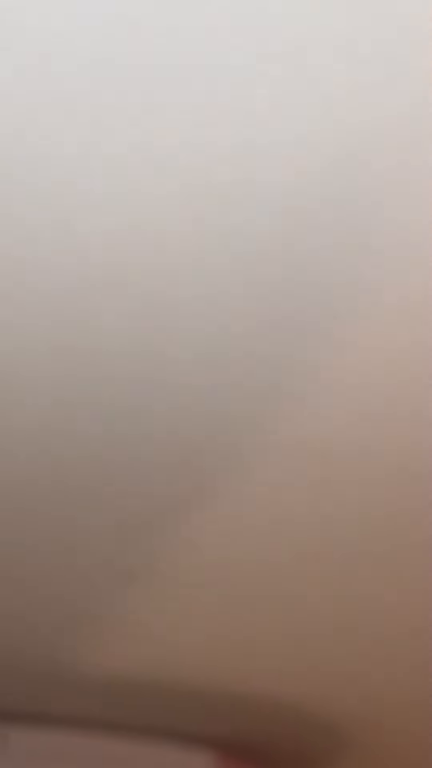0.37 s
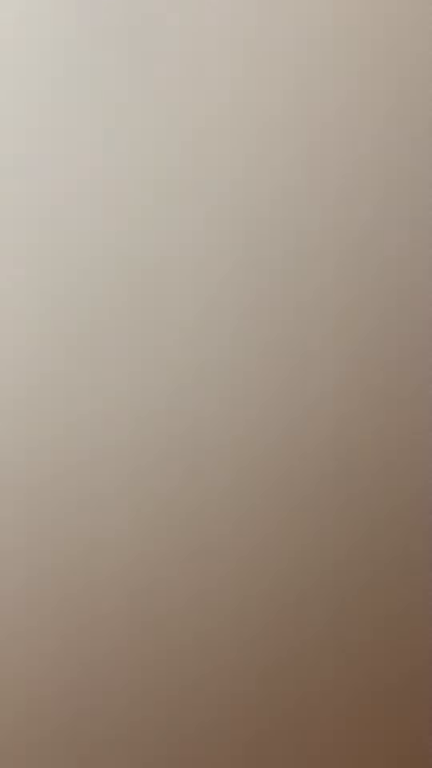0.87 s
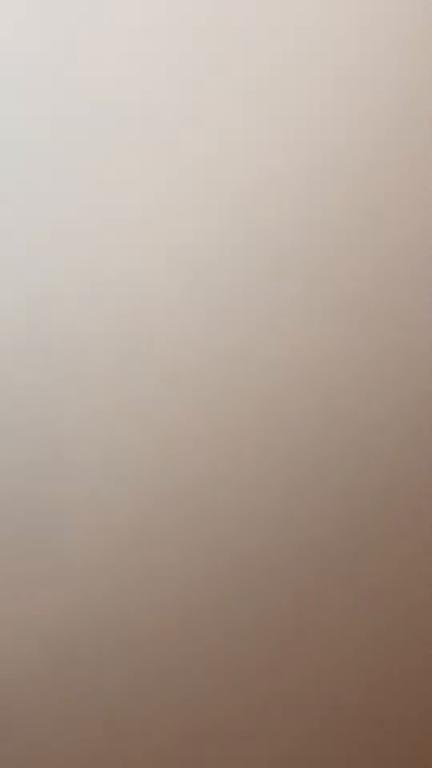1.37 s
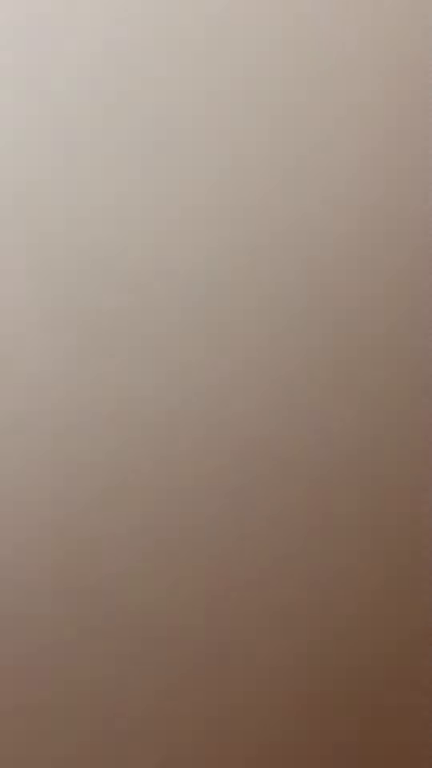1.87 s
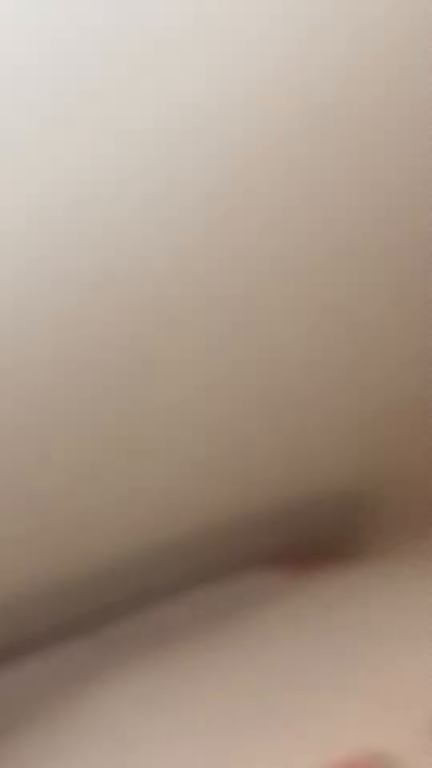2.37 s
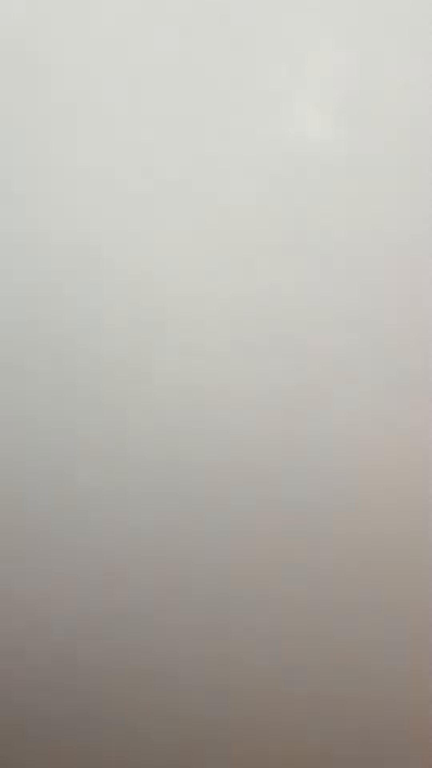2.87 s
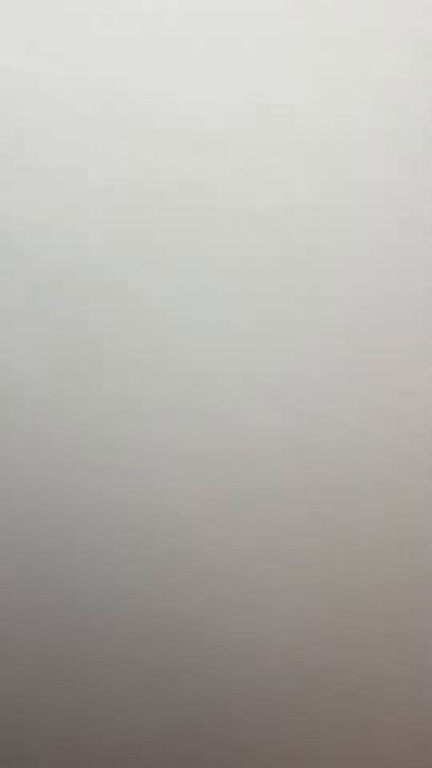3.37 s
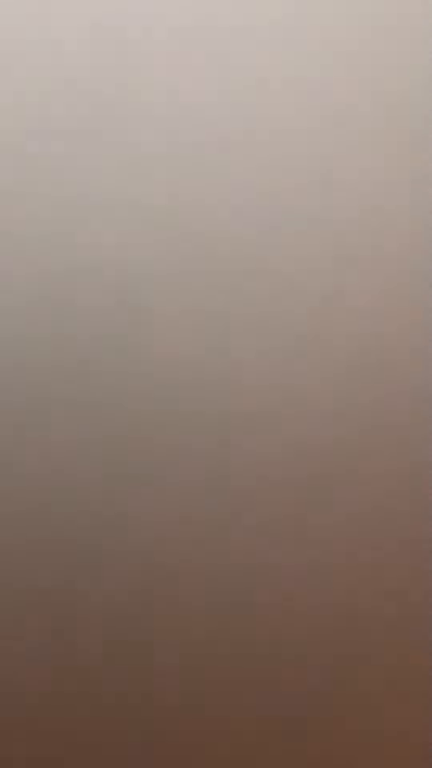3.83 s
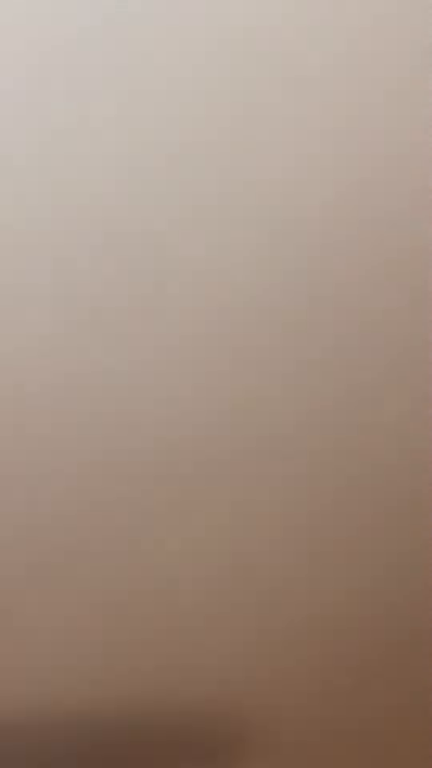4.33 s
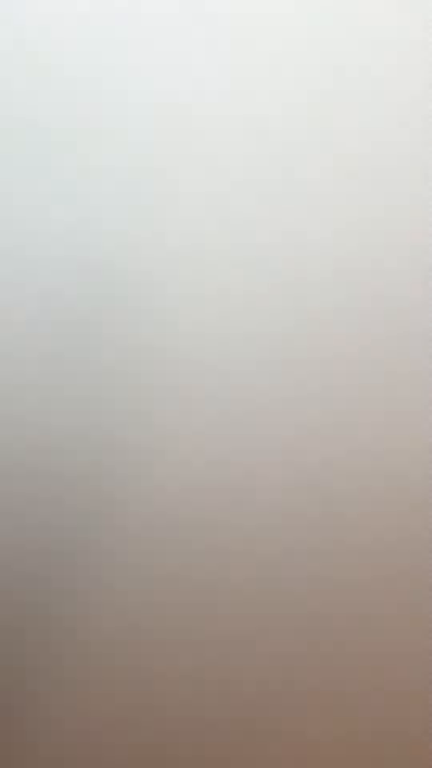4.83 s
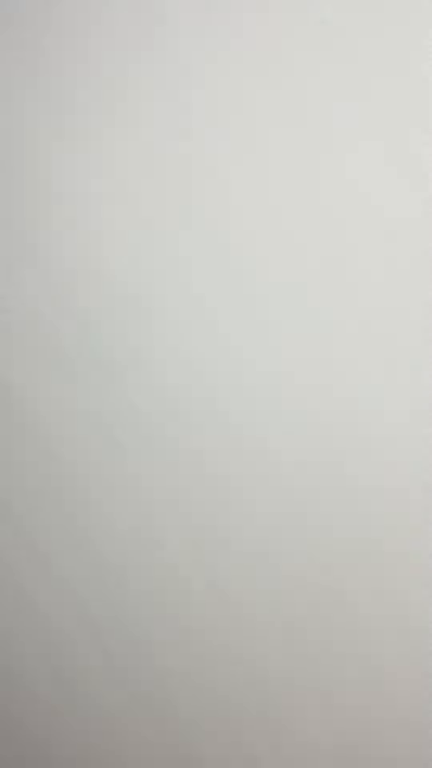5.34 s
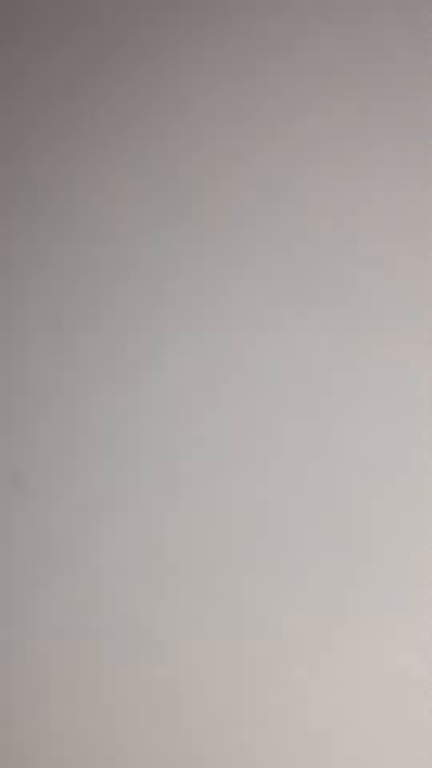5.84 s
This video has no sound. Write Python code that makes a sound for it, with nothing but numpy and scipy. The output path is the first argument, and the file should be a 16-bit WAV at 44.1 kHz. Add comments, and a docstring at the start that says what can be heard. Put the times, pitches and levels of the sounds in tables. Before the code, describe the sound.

Close handling noise of a phone in the hand, with dull heavy thuds, fabric swishes, sharp little ticks and low tremor rumble.

```python
"""A phone is turned about in the hand indoors: cloth strokes, modelled as shaped fibre noise, slide throughout.
The grip bumps the body hard near 0.5-0.7 s and again near 1.3-1.4 s; struck modes ring and hard clinks join in.
Longer strokes follow, with shell creaks clustered near 2.9 and 3.4 s and soft nudges of the body after 4.1 s.
Beneath lie hand tremor and jolts, as noise-driven resonances, and a faint room hum. Of the two microphone
ports the left takes most of the shaking; the cloth and the contacts reach both, partly alike."""
import sys
import numpy as np
from scipy import signal
from scipy.fft import rfft, irfft
from scipy.io import wavfile
from scipy.ndimage import uniform_filter1d

SR = 44100
rng = np.random.default_rng(int(sys.argv[2]) if len(sys.argv) > 2 else 0)


def to_wav(s):
    """Save 16-bit WAV."""
    ch = np.atleast_2d(s).T  # columns
    pcm = np.round(np.clip(ch, -1, 1) * 32767)  # PCM
    wavfile.write(sys.argv[1], SR, pcm.astype(np.int16))


def elevation(decibels):
    """Turn decibel levels (scalar or array-like) into linear amplitude ratios."""
    levels = np.asarray(decibels, float)
    return 10 ** (levels / 20)


N = 262836
TIME = np.arange(N) / SR
STEPS = np.arange(0, N + 64, 64) / SR   # slow time grid in s
HZ = np.maximum(np.fft.rfftfreq(N, 1 / SR), 1)

# Bumps on the body. Each row: time in seconds, body strike level in dB, pitch struck most in Hz,
# edge strike level in dB, edge pitch in Hz.
BODY_BUMPS = [(0.524, -39, 219, -59, 500), (0.588, -37, 230, -55.5, 602), (0.671, -29, 249, -34, 1000),
              (0.6745, -22.5, 250, -42.5, 1100), (0.678, -19.5, 222, -50.5, 435),
              (0.688, -20.5, 168, -50.5, 393), (0.705, -19.5, 215, -48.5, 495),
              (1.268, -38.5, 201, -77, 500), (1.329, -36, 135, -46.5, 1095), (1.339, -25, 125, -51.5, 500),
              (1.366, -32, 157, -51, 416), (1.389, -29.5, 143, -57, 450), (3.396, -54, 213, -48.5, 990),
              (4.726, -52, 192, -83, 500)]
# Soft nudges of the lowest body mode. Each row: time in seconds, strike level in dB.
PALM_NUDGES = [(1.443, -33), (4.149, -41), (4.163, -35), (4.345, -43), (4.745, -44.5)]
# Creaks of the shell. Each row: time in seconds, level in dB before a common cut, pitch struck most in Hz,
# loss away from it in dB per octave.
SHELL_TICKS = [(0.3588, -44, 4660, 17), (0.5198, -39.5, 4400, 16), (0.6712, -38, 1900, 4.5),
               (0.739, -60, 2310, -5.5), (0.7696, -45.5, 2730, 3.5), (0.8887, -43.5, 4480, 8),
               (1.1904, -31, 4670, 10.5), (1.3892, -34.5, 3220, 6.5), (1.585, -53, 4500, 1),
               (1.7056, -33.5, 9450, 6), (2.8167, -27, 9200, 8.5), (2.835, -34, 6140, 6.5),
               (2.865, -38, 8750, 14), (2.885, -34, 7040, 6.5), (2.8977, -26.5, 9500, 11),
               (3.3622, -50.5, 3910, 9), (3.397, -24, 2420, 6), (3.4108, -33.5, 2485, 5),
               (3.456, -27, 7800, 5.5), (3.9, -45.5, 3080, 4), (4.388, -37, 2410, 17),
               (4.4484, -26, 1900, 20), (4.717, -47.5, 3020, 3), (5.4799, -36, 3570, 11),
               (5.855, -54, 4200, 13)]
# Small hard clinks. Each row: time in seconds, level in dB before a common cut, pitch struck most in Hz.
HARD_CLINKS = [(1.269, -32.5, 3270), (1.3758, -41, 2470), (1.388, -29, 2510), (4.464, -43.5, 1740)]

# Noise-driven resonances of hand and body in three groups, of the right port, and of the hum.
# Each row: centre in Hz, width in Hz, relative level in dB.
SWAY_MODES = [(61.7, 32, -4), (35.8, 20, -27)]
SLOW_FLEX_MODES = [(120, 26.5, -0.27), (169.6, 17, -0.77)]
QUICK_FLEX_MODES = [(221.3, 28.6, 6), (255, 8.5, 2.5), (299, 120, -8)]
RIGHT_RUMBLE_MODES = [(63, 41, 5), (125, 47, 1.5), (213, 145, -10)]
HUM_MODES = [(114.6, 6.4, -6.5), (237.2, 5.7, -7), (459, 2.5, -5)]
# Struck modes of the body, its edge, the shell and the small hard thing.
# Each row: frequency in Hz, relative level in dB, time to decay by 60 dB in seconds.
BODY_MODES = [(69.3, 0.5, 0.072), (125.4, -5.5, 0.24), (158.8, -1.5, 0.17), (206, -10, 0.058),
              (256.6, 0, 0.11), (304, -16.5, 0.11), (435, -26.5, .06)]
EDGE_MODES = [(349, -5, .05), (408, 4, 0.069), (500, 9, 0.051), (630, 1, 0.059), (735, 3, 0.044),
              (820, -1, 0.048), (990, -1.5, 0.024), (1155, -7, 0.042), (1250, -1.5, 0.059),
              (1550, -3.5, 0.013), (1900, -10.5, 0.007), (2170, -7, 0.012)]
SHELL_MODES = [(1700, -4, 0.019), (2470, -3.5, 0.011), (3550, -1.5, 0.0067), (4200, 3, 0.0052),
               (4860, 11.5, 0.0014), (7840, 9.5, 0.0021), (8880, 4, 0.0047), (10700, 8, 0.0017),
               (14800, -6.5, 0.0016)]
HARD_MODES = [(1627, 1, 0.07), (2330, -4, 0.018), (2780, 0, 0.024), (3170, -4, 0.017), (4400, 2, 0.012),
              (5230, 2, 0.014)]

# Spectra of cloth in three parts, of cloth shaken by the body, and of the flexing back panel.
# Each row: frequency in Hz, relative level in dB.
RUSTLE_COLOUR = [(480, -6), (645, -3), (900, 0), (1300, -3.5), (1800, -1), (2400, -27)]
STROKE_COLOUR = [(1500, -26.5), (2000, 0), (2400, -1), (3500, -3), (4500, -3), (5200, -6), (5900, -10),
                 (7000, -27.5)]
TREBLE_COLOUR = [(5400, -29.5), (6100, 7.5), (6900, 6.5), (8500, 7.5), (11000, 3), (13000, 4), (15800, -7),
                 (16300, -30)]
SHAKEN_COLOUR = [(300, -12.5), (450, -1), (900, 1.5), (1500, -6.5), (2500, -18.5), (3200, -42)]
PANEL_COLOUR = [(260, -9), (350, 9.5), (420, 6), (560, 4.5), (720, -37.5)]
# Phase between the ports. Each row: frequency in Hz, lead of the left port in radians.
PORT_LEAD = [(0, 0.9), (340, 3.17), (3360, 2.98), (3960, 6.53), (4390, 7.08), (5600, 9.2), (6980, 10.8),
             (7670, 10.64), (9560, 12.9), (11100, 15.34), (13000, 15.74), (13900, 18.4), (15800, 18),
             (16400, 19.65)]
# Coherence of the ports. Each row: frequency in Hz, likeness from 0 to 1.
PORT_LIKENESS = [(300, 0.68), (450, 0.96), (900, 0.94), (1600, 0.63), (2300, 0.24), (4500, 0.33),
                 (6500, 0.52), (8000, 0.91), (15000, 0.96)]
FAR_PORT_DB = -21   # share of the body shaking that reaches the right port

# Strokes of cloth over the shell. Each row: crest in seconds, rise in seconds, fall in seconds, level in dB,
# treble in dB over the stroke.
CLOTH_STROKES = [(0.102, 0.54, 0.14, -64, -2), (.42, 0.54, 0.29, -82.5, -5), (.53, 0.058, 0.15, -70, -9.5),
                 (.67, 0.1, 0.12, -68.5, -18), (.908, 0.032, 0.17, -83.5, 0), (1.16, 0.12, 0.12, -73, -14),
                 (1.21, 0.052, 0.13, -73.5, 2.5), (1.28, 0.04, 0.32, -68.5, -21),
                 (1.398, 0.036, 0.078, -54.5, -4), (1.5, 0.2, 0.2, -72.5, -21),
                 (1.732, 0.21, 0.94, -61, -5), (2.125, 0.05, 0.096, -62, -4.5),
                 (2.489, 0.37, 0.24, -57, -3.5), (2.66, 0.12, 0.068, -65, -2.5),
                 (2.84, 0.047, 0.096, -70, -1), (2.905, 0.022, 0.089, -77, 12),
                 (3.231, 0.29, 0.28, -58, -3.5), (3.412, 0.027, 0.082, -54, -27),
                 (3.50, 0.082, 0.14, -59, -6), (3.695, 0.12, 0.081, -58.5, -3.5),
                 (3.81, 0.21, 0.038, -76, -12), (3.95, 0.075, 0.095, -61.5, -9.5),
                 (4.211, 0.27, 0.98, -60.5, -2.5), (4.52, 0.4, 0.27, -63.5, 1),
                 (4.726, 0.0089, 0.046, -59, -3.5), (4.797, 0.12, 0.11, -62, 0.5),
                 (5.199, 0.19, 0.31, -65, -5.5), (5.539, 0.07, 0.064, -76, -2.5),
                 (5.96, 0.067, 0.083, -79.5, 2)]
# How firmly the cloth presses. Each row: time in seconds, low rustle in dB over the stroke.
CLOTH_PRESSURE = [(0, 3), (.9, 8.5), (1.4, 0), (1.75, 2.5), (2.05, -5), (2.5, -7.5), (2.95, 0.5),
                  (3.4, 1.5), (3.52, 1.5), (3.7, -1), (3.95, -10), (4.35, 2), (4.6, 0.5), (4.8, -11),
                  (5.15, 4.5), (5.55, -2.5), (5.96, 0)]
STROKE_EDGE_DB = 20   # a stroke is this far down one rise before and one fall after its crest
CLOTH_REST_DB, TREBLE_REST_DB, RUSTLE_REST_DB = -86, -86, -84   # cloth lying still
RUSTLE_JOLT_DB, RUSTLE_PER_JOLT = -31.5, 0.72   # shaken cloth: offset in dB, dB per dB of jolt
SNAGS_PER_S, SNAG_DB = 210, 10.5   # single fibres catch and let go

# Jolts in the grip. Each row: time in seconds, level in dB, pitch shaken most in Hz,
# time to decay by 60 dB in seconds, right port in dB over the level.
GRIP_JOLTS = [(0.538, -37, 210, 0.43, -18), (.61, -36.5, 196, 0.46, -22), (0.679, -27.5, 244, 0.25, 4),
              (.725, -34, 170, 0.23, -26.5), (0.746, -31, 255, 0.24, -17.5), (0.783, -39.5, 261, 0.1, -28),
              (.86, -53, 226.3, 0.16, -15), (.77, -50, 61.6, 0.9, -13), (1.283, -50, 129, 0.089, -18),
              (1.336, -42, 252, 0.33, -25.5), (1.345, -33, 132, 0.46, -12), (1.387, -33, 209, 0.43, -6.5),
              (1.42, -39.5, 125, 0.54, -20), (1.457, -37, 61.7, 0.4, -29), (1.84, -58.5, 60.7, 0.076, -17),
              (2.47, -70, 119, 0.22, -1), (2.71, -61.5, 129, 0.46, -9), (3.08, -57.5, 128, 0.65, -19),
              (3.42, -58, 255, 1.4, -3.5), (3.66, -56.5, 149, 0.88, -4), (3.786, -44.5, 89.2, 0.11, -9.5),
              (3.968, -58, 220, 0.19, 6), (4.165, -53.5, 65.5, 0.3, -11), (4.21, -55, 211, 1.85, -5),
              (4.438, -51.5, 60, 0.25, -26), (4.71, -58, 238, 0.54, -10), (4.755, -50, 75, 0.99, -23),
              (5.07, -57.5, 61, .9, -7), (5.65, -56, 180, 0.2, -3)]
# Unsteadiness of the hand. Each row: time in seconds, level in dB before each group's share.
HAND_TREMOR = [(0, -73.5), (.3, -67), (.48, -70.5), (1.1, -64.5), (1.7, -66.5), (2.2, -69.5), (2.5, -62),
               (2.92, -72.5), (3.1, -63.5), (3.7, -64.5), (3.85, -66.5), (4.0, -69), (4.63, -74),
               (5.1, -65.5), (5.96, -72)]
TREMOR_SWAY_DB, TREMOR_SLOW_DB, TREMOR_QUICK_DB, TREMOR_RIGHT_DB = -2.3, -2, -1, -10   # shares
JOLT_RISE_DB_PER_CYCLE, JOLT_FOCUS_DB = 4.5, 19   # low jolts build more slowly; loss per octave off pitch
JOLT_FLICKER = 0.3   # share of the flicker left during a jolt


def rms_one(x):
    """Normalization: scales a signal to unit rms."""
    return x / np.sqrt(np.mean(x ** 2) + 1e-20)


def in_hz(points):
    """Interpolation of a spectrum along a logarithmic frequency axis."""
    hz, value = np.transpose(points)
    return np.interp(np.log(HZ), np.log(hz), value)


def drift(rate):
    """Slow random modulation of unit rms: random values, 2 * rate of them a second, joined by lines."""
    knots = rng.standard_normal(N // 64)
    return rms_one(np.interp(TIME * rate * 2, np.arange(len(knots)), knots))


def grains(grain_db, channels):
    """Impulsive noise: white noise whose samples differ much in size."""
    size = np.minimum(rng.exponential(size=(channels, N)), 5.0)
    return rng.standard_normal((channels, N)) * elevation(grain_db * size)


def ports(shared, own, colour=1):
    """Partial coherence: the right port hears the shared part phase-shifted, the rest from its own source."""
    alike = np.clip(in_hz(PORT_LIKENESS), 0, 1)
    lag = np.exp(-1j * np.interp(HZ, *np.transpose(PORT_LEAD)))
    left = rfft(shared) * colour
    right = alike * lag * left + np.sqrt(1 - alike ** 2) * rfft(own) * colour
    return irfft([left, right], N)


def fibres(spectrum, grain_db, patchy_db, flicker_db, count):
    """Frictional noise: coloured grains at both ports, each band swelling and fluttering on its own."""
    snags = elevation(SNAG_DB * (rng.random((2, N)) < SNAGS_PER_S / SR))
    both = rfft(ports(*(snags * grains(grain_db, channels=2)), elevation(in_hz(spectrum))))
    ends = np.log([spectrum[0][0], spectrum[-1][0]])
    place = np.interp(np.log(HZ), ends, [0, count - 1])
    total = np.zeros((2, N))
    for k in range(count):
        band = irfft(both * np.clip(1 - np.abs(place - k), 0, 1), N)   # overlapping triangles
        patches = patchy_db * drift(5.0)
        flicker = flicker_db * (drift(30) + 0.57 * drift(140))
        total += band * elevation(patches + flicker)
    return rms_one(total)


def resonances(modes):
    """Frequency response of parallel resonances, each steep-sided, added as powers."""
    power = 0
    for hz, width, db in modes:
        detuning = (HZ - hz ** 2 / HZ) / width
        power = power + elevation(2 * db) / (1 + detuning ** 2) ** 2
    return np.sqrt(power)


def shaken(modes, flicker_db, rate, steady_s):
    """Random excitation of resonances, with long swells evened out and flicker imposed; rms 1."""
    ring = irfft(rfft(grains(3.83, channels=1)[0]) * resonances(modes), N)
    swell = np.sqrt(uniform_filter1d(ring ** 2, int(steady_s * SR)) + 1e-12)
    return rms_one(ring / swell * elevation(flicker_db * drift(rate)))


def strike(at_s, level_db, pitch_hz, modes, focus_db, spread_db, flip=-1):
    """Modal excitation: a blow rings every mode, most those near its pitch; flip 1 starts them in step."""
    at = (np.asarray(at_s) * SR).astype(int)
    out = np.zeros((2, N))
    chance = rng.standard_normal((len(at), 2, len(modes)))
    for k, (hz, db, t60) in enumerate(modes):
        r = elevation(-60 / (t60 * SR))   # decay per sample
        w = 2 * np.pi * hz / SR
        strength = level_db + db - focus_db * np.abs(np.log2(hz / pitch_hz))   # focus in dB per octave
        clicks = np.full((2, N), 1e-18)
        clicks[:, at] = elevation(strength + spread_db * chance[:, :, k].T) * flip ** k
        out += signal.lfilter([0, np.sin(w)], [1, -2 * r * np.cos(w), r * r], clicks)
    return out


def gritty(rings, tail_db, t60):
    """Repeated micro-contact: each contact goes on as a dying crackle of smaller ones."""
    age = np.arange(SR // 5) / SR
    tail = grains(4.77, channels=2)[:, :len(age)] * elevation(tail_db - 60 * age / t60)
    return rings + signal.fftconvolve(rings, tail, axes=1)[:, :N]


def summed_db(event_db, rest_db):
    """Power addition of events (rows on the slow grid) and a resting level; dB at every sample."""
    power = elevation(2 * np.maximum(event_db, -200)).sum(axis=0) + elevation(2 * rest_db)
    return np.interp(TIME, STEPS, 10 * np.log10(power))


def jolts(hz=None):
    s, db, pitch_hz, t60, right_db = np.transpose(GRIP_JOLTS)[:, :, None]
    age = STEPS - s
    shape_db = np.where(age < 0, age * pitch_hz * JOLT_RISE_DB_PER_CYCLE, -60 * age / t60)
    if hz is None:
        return db + shape_db + right_db
    return db + shape_db - JOLT_FOCUS_DB * np.abs(np.log2(hz / pitch_hz))


def group(modes, hz, share_db, flicker_db, rate, steady_s):
    """Forced resonance under tremor and jolts: the tremor flickers, a jolt rings out more steadily."""
    tremor_db = np.interp(STEPS, *np.transpose(HAND_TREMOR)) + share_db
    level_db = summed_db(jolts(hz), tremor_db)
    calm = elevation(np.interp(TIME, STEPS, tremor_db) - level_db)   # 1 where no jolt sounds
    flicker = flicker_db * (JOLT_FLICKER + (1 - JOLT_FLICKER) * calm)
    return level_db, elevation(level_db) * shaken(modes, flicker, rate, steady_s)


def hum():
    """Narrow-band noise: a faint broken hum from the room, opposite in sign and halved at the right port."""
    return elevation(-72) * shaken(HUM_MODES, flicker_db=0.5, rate=5.1, steady_s=0.31) * [[1], [-0.5]]


def cloth():
    """Sliding friction: strokes drive three colours of fibre noise; jolts shake out a duller one."""
    s, rise, fall, db, treble_db = np.transpose(CLOTH_STROKES)[:, :, None]
    age = STEPS - s
    each_db = db - STROKE_EDGE_DB * (age / np.where(age < 0, rise, fall)) ** 2
    stroke_db = summed_db(each_db, CLOTH_REST_DB)
    bright_db = summed_db(each_db + treble_db, TREBLE_REST_DB)
    rustle_db = summed_db(each_db + np.interp(STEPS, *np.transpose(CLOTH_PRESSURE)), RUSTLE_REST_DB)
    shaken_db = summed_db(RUSTLE_JOLT_DB + RUSTLE_PER_JOLT * jolts(QUICK_FLEX_MODES[1][0]), -110)
    shaken_cloth = fibres(SHAKEN_COLOUR, grain_db=5.0, patchy_db=1.0, flicker_db=3.0, count=2)
    stroke = fibres(STROKE_COLOUR, grain_db=2.5, patchy_db=1.0, flicker_db=1.54, count=7)
    treble = fibres(TREBLE_COLOUR, grain_db=1.0, patchy_db=2.5, flicker_db=2.0, count=5)
    rustle = fibres(RUSTLE_COLOUR, grain_db=3.5, patchy_db=2.0, flicker_db=3.0, count=5)
    sliding = stroke * elevation(stroke_db) + treble * elevation(bright_db) + rustle * elevation(rustle_db)
    return sliding + shaken_cloth * elevation(shaken_db)


def ticks():
    """Impulse response of the shell: each creak rings its short modes."""
    s, peak_db, hz, focus_db = np.transpose(SHELL_TICKS)
    creaks = strike(s, peak_db - 13.5, hz, SHELL_MODES, focus_db, spread_db=2.5)
    return ports(*gritty(creaks, tail_db=-41, t60=0.24))


def clinks():
    """Impact of something small and hard, jolted mostly by the second bump: its modes outlast the shell's."""
    s, peak_db, hz = np.transpose(HARD_CLINKS)
    rings = strike(s, peak_db - 13.0, hz, HARD_MODES, focus_db=17.5, spread_db=0.5)
    return ports(*gritty(rings, tail_db=-34.5, t60=0.32))


def nudges():
    """Slow excitation: the palm pushes slowly, so only the deepest mode answers."""
    s, peak_db = np.transpose(PALM_NUDGES)
    push = strike(s, peak_db, BODY_MODES[0][0], BODY_MODES[:1], focus_db=0, spread_db=1.0, )[0]
    push = signal.lfilter(*signal.butter(2, [35.0, 130.0], "band", fs=SR), push)
    return push * [[1], [elevation(FAR_PORT_DB)]]


def grip():
    """Forced vibration by the hand: the right port gets a little of it and a rumble of its own."""
    _, sway = group(SWAY_MODES, SWAY_MODES[0][0], TREMOR_SWAY_DB, flicker_db=3.0, rate=13.0, steady_s=0.1)
    _, slow = group(SLOW_FLEX_MODES, SLOW_FLEX_MODES[0][0], TREMOR_SLOW_DB,
                    flicker_db=5.0, rate=7.0, steady_s=0.039)
    quick_db, quick = group(QUICK_FLEX_MODES, QUICK_FLEX_MODES[1][0], TREMOR_QUICK_DB,
                            flicker_db=3.0, rate=20, steady_s=0.027)
    _, rumble = group(RIGHT_RUMBLE_MODES, None, TREMOR_RIGHT_DB, flicker_db=7.5, rate=15, steady_s=0.15)
    left = sway + slow + quick
    # the back panel follows the quick flex, less steeply
    panel = fibres(PANEL_COLOUR, grain_db=2.5, patchy_db=4.5, flicker_db=3.5, count=4)
    panel = elevation(0.57 * quick_db - 30) * panel
    return np.array([left, rumble + elevation(FAR_PORT_DB) * left]) + panel


def bumps():
    """Contact stiffness: a soft contact rings the body, its harder edge the middle modes."""
    s, peak_db, hz, edge_db, edge_hz = np.transpose(BODY_BUMPS)
    body = strike(s, peak_db, hz, BODY_MODES, focus_db=17, spread_db=1.0, flip=1)[0]
    body = signal.lfilter(*signal.butter(2, [95.0, 450.0], "band", fs=SR), body)
    edge = strike(s, edge_db, edge_hz, EDGE_MODES, focus_db=11.5, spread_db=4.0)
    return ports(*gritty(edge, tail_db=-30.5, t60=0.19)) + body * [[1], [elevation(FAR_PORT_DB)]]


def scene():
    """Superposition of all that reaches the two ports."""
    return hum() + cloth() + ticks() + clinks() + nudges() + grip() + bumps()


def low_pass(x):
    """Removes everything above the highest recorded frequency."""
    return signal.sosfilt(signal.butter(12, 16780, fs=SR, output="sos"), x)


def record(dry):
    """Low-pass filtering: the top is cut steeply, 70 dB down from 16.9 kHz."""
    top_cut = signal.cheby2(12, 70, 16900, fs=SR, output="sos")
    mix = signal.sosfilt(top_cut, dry)
    return low_pass(mix)


dry = scene()
out = record(dry)
to_wav(out)
```